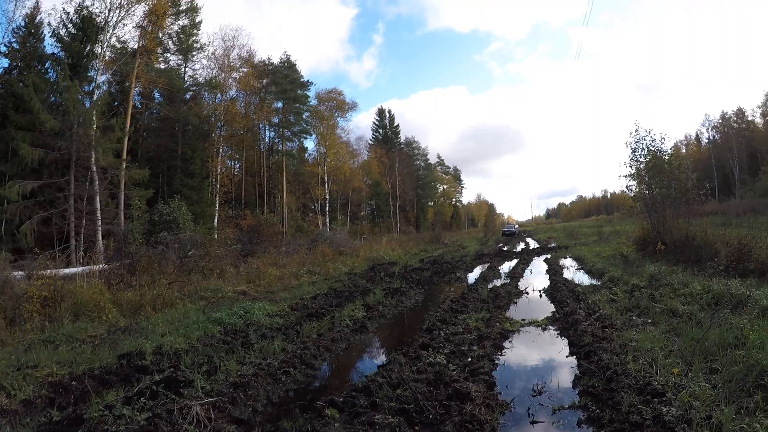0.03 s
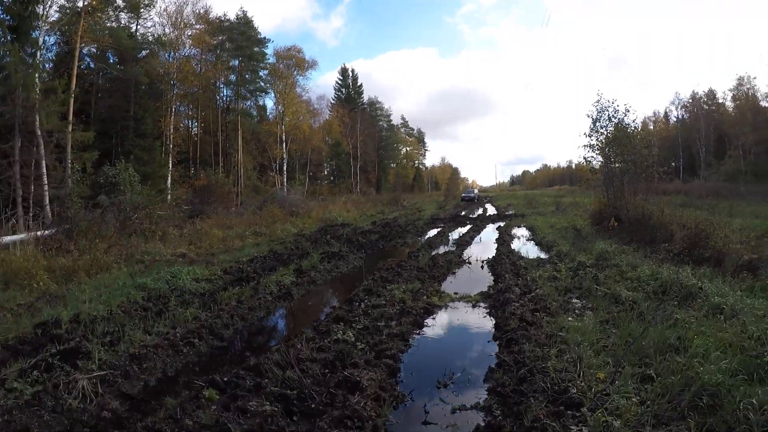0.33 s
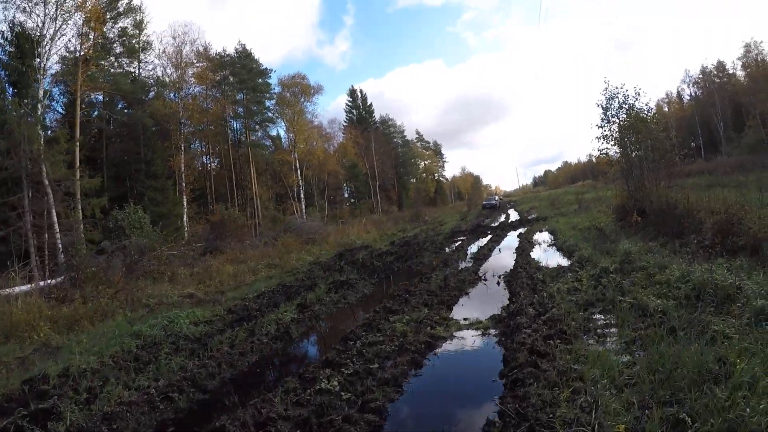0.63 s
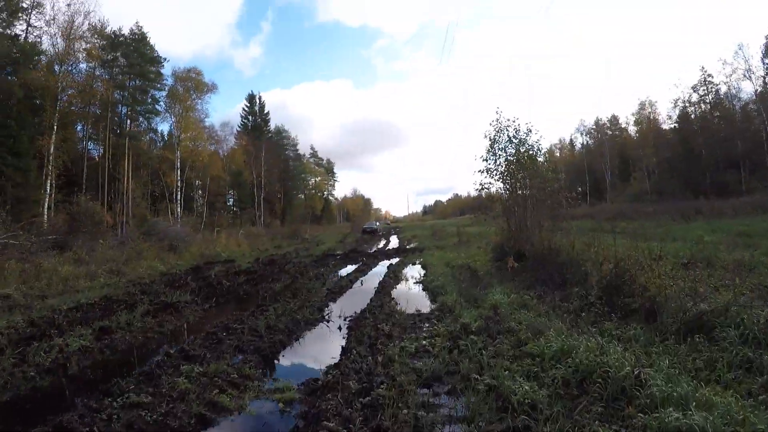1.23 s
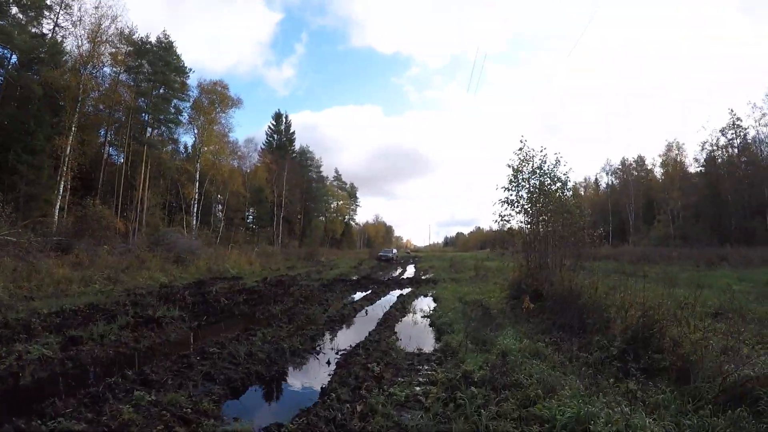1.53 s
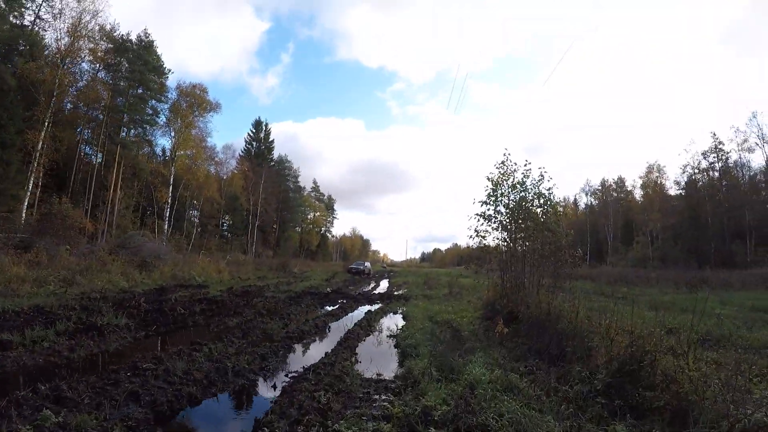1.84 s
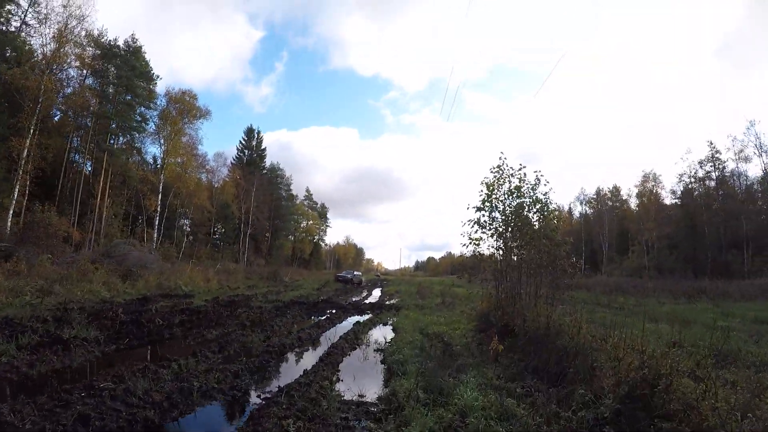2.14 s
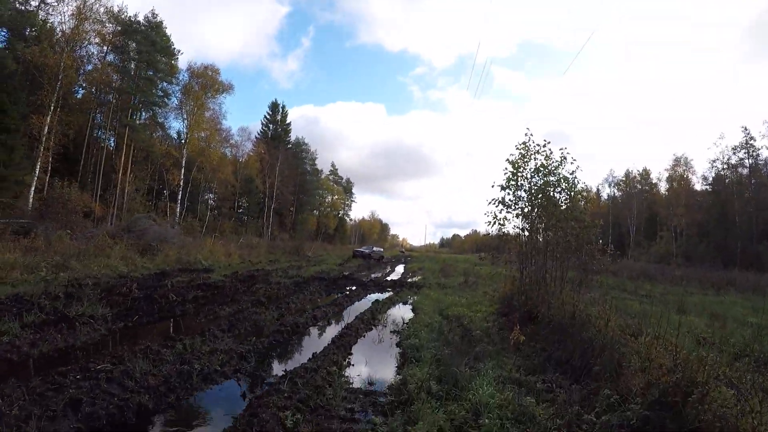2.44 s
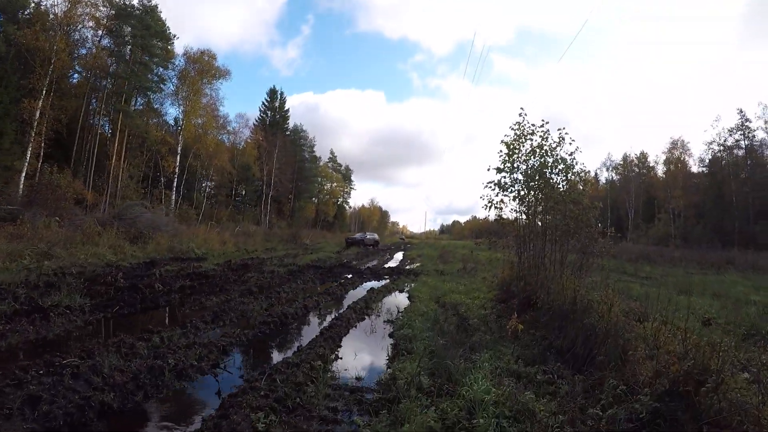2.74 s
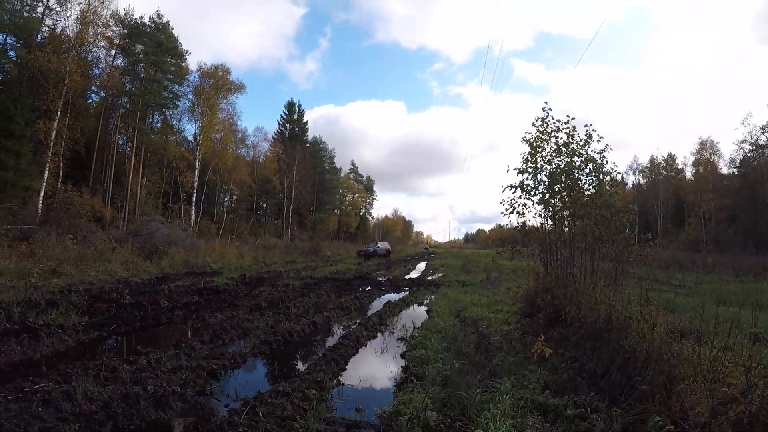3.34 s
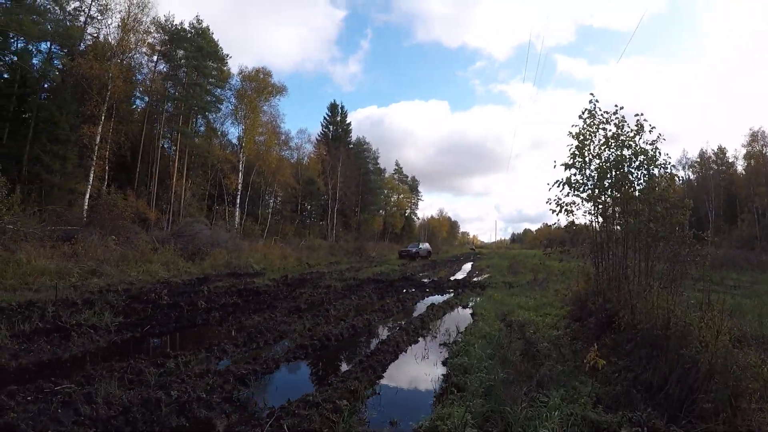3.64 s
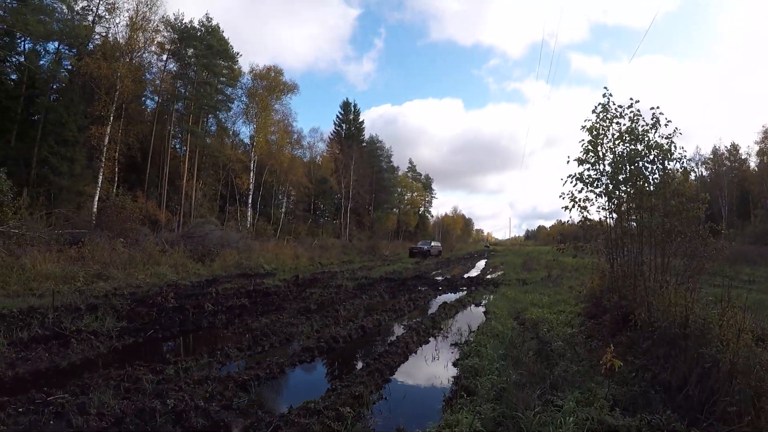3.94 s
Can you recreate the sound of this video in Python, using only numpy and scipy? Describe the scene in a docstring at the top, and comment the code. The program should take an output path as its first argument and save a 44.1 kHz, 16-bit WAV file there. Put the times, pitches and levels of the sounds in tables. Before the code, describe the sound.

Soft muddy footsteps rasp, click and squelch in uneven bursts along a forest track. Handling bumps knock the hand-held microphone midway, while wind rumble, rustling leaves and a distant off-road vehicle's drone all grow louder.

```python
"""Beside a rutted forest track: rubs and muddy squelches, heard on a hand-held camera.
Wind rumbles more and more on the microphone, leaves rustle, an off-road engine drones far off.
Jolts thump the camera body, mud and stalks click, and a boot squeezes mud through narrow gaps.
Rubs against the camera or clothing rasp and hiss, with tiny pops. The sound opens from mono to stereo."""
import sys
import numpy as np
from scipy import signal
from scipy.fft import rfft, irfft
from scipy.io import wavfile
from scipy.ndimage import uniform_filter1d

SR = 44100
rng = np.random.default_rng(int(sys.argv[2]) if len(sys.argv) > 2 else 0)


def materialize(psi):
    """Save the field psi as 16-bit PCM at rate SR to the path in sys.argv[1].

    A 1-D psi becomes a single channel; in a 2-D psi each row is a channel.
    """
    bounded = np.clip(np.atleast_2d(psi).T, -1, 1)
    quanta = np.round(bounded * 32767).astype(np.int16)
    wavfile.write(sys.argv[1], SR, quanta)


N = 176400


def undb(db):
    """Decibels to gain."""
    return 10 ** (np.asarray(db) / 20)


def unit(x):
    """Scale to rms 1."""
    return x / np.sqrt(np.mean(x ** 2))


def curve(table, column):
    """One table column, linear in time between rows."""
    rows = np.array(table)
    return np.interp(np.arange(N) / SR, rows[:, 0], rows[:, column])


def colour(x, spectrum, patchy_db=0):
    """Filter by (frequency [Hz], gain [dB]) points, with optional random bumps."""
    hz, db = np.array(spectrum).T
    log_hz = np.log(np.fft.rfftfreq(len(x), 1 / SR) + 1)
    knots = np.linspace(np.log(300), np.log(16000), 36)
    bumps = np.interp(log_hz, knots, rng.standard_normal(len(knots)))
    gain_db = np.interp(log_hz, np.log(hz), db) + patchy_db * bumps
    return irfft(rfft(x) * undb(gain_db), len(x))


def wander(rate_hz):
    """Smooth random curve, rms 1."""
    hold = max(int(SR / rate_hz), 1)
    steps = np.repeat(rng.standard_normal(N // hold + 1), hold)
    return unit(uniform_filter1d(uniform_filter1d(steps, hold), hold)[:N])


def add(out, start_s, sound):
    """Mix a sound in at its start time."""
    i = int(start_s * SR)
    out[:, i:i + sound.shape[-1]] += sound[..., :N - i]


def pan(left_db):
    """Channel gains for a left-over-right level difference."""
    gains = undb(np.array([[left_db], [-left_db]]) / 2)
    return gains / gains.mean()


def spread(mid, side, width):
    """Mid and side to left and right."""
    return mid + width * side * np.array([[1], [-1]])


# Open-air side relative to mid, at width 1 (frequency [Hz], gain [dB])
SIDE_SPECTRUM = [(400, 2.5), (750, 8), (1300, 1.5), (2400, -6.5), (4200, -14), (6000, 0), (15000, 0)]


def open_air(mid, side, width):
    """Stereo whose width varies with frequency."""
    return spread(mid, colour(side, SIDE_SPECTRUM), width)


def noise(spectrum, width):
    """Coloured stereo noise."""
    mid, side = (unit(colour(rng.standard_normal(N), spectrum)) for _ in range(2))
    return open_air(mid, side, width)


# Wind levels (time [s], rumble [dB], rush [dB], rustle [dB])
WIND_LEVELS = [(0, -48, -71, -73.5), (.3, -47, -64, -81), (.66, -51.5, -62.5, -73), (.9, -36.5, -64, -63.5),
               (1.4, -35, -50, -60.5), (1.62, -32.5, -49.5, -57), (2.05, -34, -49, -53.5),
               (2.35, -27, -43.5, -54), (2.52, -25.5, -37.5, -53), (2.72, -29, -47, -48.5),
               (3.05, -26, -48, -51.5), (3.3, -27, -43, -48.5), (4, -30, -41.5, -49)]
# Wind spectra (frequency [Hz], gain [dB])
RUMBLE_SPECTRUM = [(10, -15), (22, -1), (36, 1.5), (55, -9.5), (110, -8.5), (170, -16.5), (230, -20.5),
                   (330, -36), (800, -69)]
RUSH_SPECTRUM = [(80, -35), (180, 8.5), (280, -0.5), (400, -2.5), (600, -11.5), (900, -26.5), (2000, -64)]
RUSTLE_SPECTRUM = [(200, 13.5), (800, 3.5), (1900, 6), (3100, 0.5), (4200, 6), (5100, 0), (6100, 1.5),
                   (8000, -7), (10000, -9), (13000, -19), (15000, -40)]


def wind():
    """Gusts rumble and rush on the microphone; leaves and grass rustle all around."""
    rumble_db, rush_db, rustle_db = (curve(WIND_LEVELS, column) for column in (1, 2, 3))
    gust_db = 1.2 * wander(rate_hz=15)
    rumble = noise(RUMBLE_SPECTRUM, width=0.26) * undb(rumble_db + gust_db)
    rush = noise(RUSH_SPECTRUM, width=0.48) * undb(rush_db + gust_db)
    rustle = noise(RUSTLE_SPECTRUM, width=0.98) * undb(rustle_db + 0.7 * wander(rate_hz=24.88))
    return rumble + rush * pan(left_db=8.5) + rustle * pan(left_db=-1.5)


# Crank speed (time [s], speed [rev/s])
CRANK_SPEED = [(0, 37.2), (.5, 38.6), (1.0, 39), (1.6, 38.3), (2.0, 42), (2.3, 39.8), (2.7, 36.1),
               (3.0, 36.4), (3.4, 37.4), (3.75, 37.3), (4, 38.2)]
# Engine levels (time [s], orders up to 5 [dB], orders above 5 [dB])
ENGINE_LEVELS = [(0, -50, -55.5), (.5, -49, -48), (1.5, -45, -54.5), (2.1, -39, -56.5), (2.8, -36, -32),
                 (3.3, -33.5, -29), (3.7, -31, -32.5), (4, -28.5, -37.5)]
# Exhaust orders (multiple of crank speed [-], level offset [dB])
EXHAUST_ORDERS = [(2, -9.5), (3, 0.5), (4, -7), (6, -8.5), (8, -26)]


def engine():
    """Low exhaust orders follow the crank and waver with the distance."""
    speed_hz = curve(CRANK_SPEED, 1) * (1 + 0.004 * wander(rate_hz=12))
    crank_rad = 2 * np.pi * np.cumsum(speed_hz) / SR
    lower_db, upper_db = curve(ENGINE_LEVELS, 1), curve(ENGINE_LEVELS, 2)
    drone = np.zeros(N)
    for order, offset_db in EXHAUST_ORDERS:
        level_db = offset_db + (upper_db if order > 5 else lower_db) + 1.5 * wander(rate_hz=7.8)
        drone += undb(level_db) * np.sin(order * crank_rad + 2 * np.pi * rng.random())
    return np.sqrt(2) * drone * pan(left_db=4)


def thumps(table, rise_s, sag=0.16):
    """A few low cycles swell and die, sagging from above the centre pitch to below it."""
    out, t = np.zeros((2, N)), np.arange(SR // 2) / SR
    envelope = t / rise_s * np.exp(1 - t / rise_s)
    glide = 1 + sag * (2 * np.exp(-t / (2 * rise_s)) - 1)
    for start_s, peak_db, centre_hz in table:
        phase_rad = 2 * np.pi * np.cumsum(centre_hz * glide) / SR
        add(out, start_s, -undb(peak_db) * envelope * np.sin(phase_rad))
    return out


# Air buffets (time [s], peak [dB], centre pitch [Hz])
AIR_BUFFETS = [(.888, -21.5, 29.7), (2.745, -16.5, 37.3)]


def buffets():
    """Slow pushes of air hit the microphone."""
    return thumps(AIR_BUFFETS, rise_s=0.024)


# Camera jolts (time [s], peak [dB], centre pitch [Hz])
BODY_JOLTS = [(.688, -25.5, 96), (1.342, -29.5, 140), (1.494, -25.5, 148), (1.636, -27, 144.3),
              (1.756, -19, 146.7), (1.772, -18.5, 135), (2.182, -10.5, 128.5), (2.468, -12.5, 142),
              (2.486, -12.5, 151.6), (2.503, -13, 144), (2.624, -14.5, 158)]


def jolts():
    """Jolts thump the camera body."""
    return thumps(BODY_JOLTS, rise_s=0.0056)


# Mud and stalk clicks (time [s], level [dB], ring [Hz], crack gain [dB], crack cutoff [Hz], decay [s])
MUD_CLICKS = [(.322, -53, 480, -3, 2500, 0.0046), (0.767, -41.5, 438, -1, 5500, 0.0097),
              (1.123, -34.5, 845, 0.5, 2000, 0.0058), (1.4, -39.5, 1430, 3, 5000, 0.0053),
              (1.684, -39.5, 600, -14, 2500, 0.0063), (1.754, -36.5, 1130, 3, 3500, 0.0032),
              (1.889, -28, 624, 3, 5230, 0.0034), (2.4653, -29, 547, 2.5, 1730, 0.0043),
              (2.483, -28.5, 557, -1.5, 1970, 0.0035), (2.501, -31.5, 670, 3, 2400, 0.00334),
              (2.619, -31, 550, 8, 2340, 0.0015), (2.783, -38.5, 528, 5, 2000, 0.01),
              (2.837, -40.5, 1590, 6, 2480, 0.0092), (2.896, -37.5, 3950, 3, 5750, 0.0041),
              (3.365, -26.5, 1937, 9, 8800, 0.0028), (3.428, -29.5, 1460, 6.5, 3950, 0.0017),
              (3.4305, -27.5, 3486, -3, 4500, 0.0021)]
# Crack spectrum (frequency [Hz], gain [dB])
CRACK_SPECTRUM = [(300, 8), (1000, 4), (2000, 3), (3000, -4.5), (4500, -2.5), (7000, 0), (9000, -3.5),
                  (15000, -17)]


def clicks(left_lag_s=0.00016):
    """To the right, a small pocket rings under a broad crack, duller where the contact is soft."""
    out, t = np.zeros((2, N)), np.arange(SR // 10) / SR
    for start_s, level_db, ring_hz, crack_db, cutoff_hz, decay_s in MUD_CLICKS:
        low_hz = min(0.88 * ring_hz, cutoff_hz / 2)
        band = signal.butter(2, [low_hz, cutoff_hz], "bandpass", fs=SR, output="sos")
        burst = colour(rng.standard_normal(len(t)), CRACK_SPECTRUM)
        crack = undb(crack_db) * unit(signal.sosfilt(band, burst)) / 2
        right = (np.sin(2 * np.pi * ring_hz * t) + crack) * np.exp(-t / decay_s)
        left = np.interp(t - left_lag_s, t, right, left=0)
        add(out, start_s, undb(level_db) * np.array([left, right]) * pan(left_db=-16.5))
    return out


GRAINS_PER_S, NEAR_PAN_DB = 4000, 1.5  # squelches and rubs
# Mud squeezed under the boot (start [s], end [s], level [dB], start pitch [Hz], end pitch [Hz])
MUD_SQUELCHES = [(1.105, 1.226, -52, 830, 1330), (1.186, 1.343, -52.5, 1840, 1950),
                 (1.943, 2.087, -48.5, 2190, 2430), (2.001, 2.2, -54, 1550, 1800),
                 (2.262, 2.346, -51.5, 1730, 1780), (2.326, 2.394, -43.5, 350, 480),
                 (2.787, 2.896, -53.5, 2070, 2170)]


def squelches(bandwidth_hz=230):
    """Tiny bursts ring a wet gap whose pitch rises as the boot presses it shut."""
    out, pole = np.zeros((2, N)), np.exp(-np.pi * bandwidth_hz / SR)
    for start_s, end_s, level_db, from_hz, to_hz in MUD_SQUELCHES:
        press = np.linspace(0, 1, int((end_s - start_s) * SR))
        pitch_hz = from_hz + (to_hz - from_hz) * press
        carrier = np.exp(2j * np.pi * np.cumsum(pitch_hz) / SR)
        bursts = rng.standard_normal(SR) * (rng.random(SR) < GRAINS_PER_S / SR)
        # Shift down, low-pass, shift back: a gliding resonance.
        ring = (carrier * signal.lfilter([1], [1, -pole], bursts[:len(press)] / carrier)).imag
        envelope = np.sqrt(4 * press * (1 - press))
        add(out, start_s, undb(level_db) * unit(ring) * envelope * pan(NEAR_PAN_DB))
    return out


def grains(spectrum, resonance_hz, boost_db, size, scatter_db=3, half_width_oct=0.32):
    """Dense tiny slips of uneven strength ring one resonance."""
    hits = rng.random(size) < GRAINS_PER_S / SR
    pulses = hits * rng.choice([-1, 1], size) * undb(scatter_db * rng.standard_normal(size))
    offset_oct = np.log2((np.fft.rfftfreq(size, 1 / SR) + 1) / resonance_hz)
    resonance = undb(boost_db / (1 + (offset_oct / half_width_oct) ** 2))
    ringing = irfft(rfft(pulses) * resonance, size)
    return unit(colour(ringing, spectrum, patchy_db=1.3))


# Rubs and brushes against the camera or clothing
# (start [s], end [s], attack [s], rasp [dB], rasp resonance [Hz], hiss [dB], hiss resonance [Hz])
RUBS = [(0.199, 0.622, 0.089, -74.5, 990, -88, 4400), (0.689, 0.725, 0.0044, -62.5, 1890, -65.5, 6600),
        (0.797, 0.892, 0.073, -51, 2200, -53.5, 3570), (0.888, 1.165, 0.3, -48.5, 1220, -72, 4200),
        (1.139, 1.262, 0.035, -49.5, 1810, -50.5, 3870), (1.262, 1.354, 0.01, -50, 1900, -55.5, 6970),
        (1.375, 1.452, 0.023, -47, 2380, -49.5, 4500), (1.486, 1.516, 0.0136, -49, 2200, -63, 4300),
        (1.698, 1.817, 0.072, -55.5, 1800, -55, 4270), (1.787, 1.893, 0.019, -46, 2320, -49, 4400),
        (1.849, 2.077, 0.052, -46, 2340, -62, 3300), (2.063, 2.19, 0.037, -45, 1720, -54.5, 5800),
        (2.139, 2.215, 0.042, -43.5, 1800, -42, 5030), (2.217, 2.299, 0.024, -50.5, 1750, -53, 4630),
        (2.337, 2.528, 0.13, -52, 1314, -79, 4180), (2.767, 2.852, 0.0079, -50.5, 1940, -53, 4210),
        (2.849, 2.89, 0.06, -46.5, 2080, -44, 4340), (3.111, 3.24, 0.015, -67, 2000, -49.5, 4170),
        (3.268, 3.446, 0.063, -53.5, 1872, -49.5, 7460)]
# Rasp and hiss spectra (frequency [Hz], gain [dB])
RASP_SPECTRUM = [(450, 8.5), (800, 4), (1300, 0), (1550, 0.5), (1850, 1), (2300, -2.5), (2800, -7.5),
                 (4000, -8), (7000, -79)]
HISS_SPECTRUM = [(500, -16), (1500, 5), (2900, 3), (4100, 5), (5200, 3), (7000, 3), (8400, -4),
                 (10000, -10), (11500, -24), (15000, -24)]


def rubs(release_s=0.015, rasp_boost_db=7, hiss_boost_db=5.5, flutter_db=1.3):
    """Each rub against the camera or clothing swells and stops quickly: a rasp under a hiss."""
    out, t = np.zeros((2, N)), np.arange(SR // 2) / SR
    for start_s, end_s, attack_s, rasp_db, rasp_hz, hiss_db, hiss_hz in RUBS:
        past_end_s = np.maximum(t - (end_s - start_s), 0)
        envelope = np.minimum(t / attack_s, 1) * np.exp(-past_end_s / release_s)
        rasp = (RASP_SPECTRUM, rasp_db, rasp_hz, rasp_boost_db, NEAR_PAN_DB)
        hiss = (HISS_SPECTRUM, hiss_db, hiss_hz, hiss_boost_db, 0)
        for spectrum, level_db, resonance_hz, boost_db, pan_db in (rasp, hiss):
            mid, side = (grains(spectrum, resonance_hz, boost_db, len(t)) for _ in range(2))
            texture = open_air(mid, side, width=0.98) * pan(pan_db)
            add(out, start_s, undb(level_db) * envelope * texture)
    return out * undb(flutter_db * wander(rate_hz=70))


def pops(pops_per_s=70, centre_hz=2600, spread_oct=1.3, decay_cycles=1.5, max_over_rasp_db=12):
    """Tiny pops ring at random during each rub, louder as it swells."""
    out, t = np.zeros((2, N)), np.arange(SR // 50) / SR
    for start_s, end_s, attack_s, rasp_db, *_ in RUBS:
        length_s = end_s - start_s
        for when, pitch, strength in rng.random((int(length_s * pops_per_s), 3)):
            ring_hz = centre_hz * 2 ** (spread_oct * (2 * pitch - 1))
            ring = np.sin(2 * np.pi * ring_hz * t) * np.exp(-t * ring_hz / decay_cycles)
            delay_s = when * length_s
            swell = min(delay_s / attack_s, 1)
            add(out, start_s + delay_s, undb(rasp_db + max_over_rasp_db) * swell * strength * ring)
    return out


def scene():
    """Rubs, squelches, jolts and clicks over the engine and the wind."""
    return rubs() + squelches() + pops() + jolts() + buffets() + clicks() + engine() + wind()


def record(dry):
    """The sound fades in, starts in mono and opens to stereo; the top is cut."""
    t = np.arange(N) / SR
    fade_s, widen_s, cutoff_hz = (0.079, 0.26), (2.55, 4.2), 15300
    fade = np.interp(t, fade_s, (0, 1))
    width = np.sqrt(np.interp(t, widen_s, (0, 1)))
    mid, side = dry.mean(0), (dry[0] - dry[1]) / 2
    lowpass = signal.ellip(8, 0.2, 70, cutoff_hz, fs=SR, output="sos")
    return signal.sosfilt(lowpass, spread(mid, side, width) * fade)


dry = scene()
out = record(dry)
materialize(out)
```